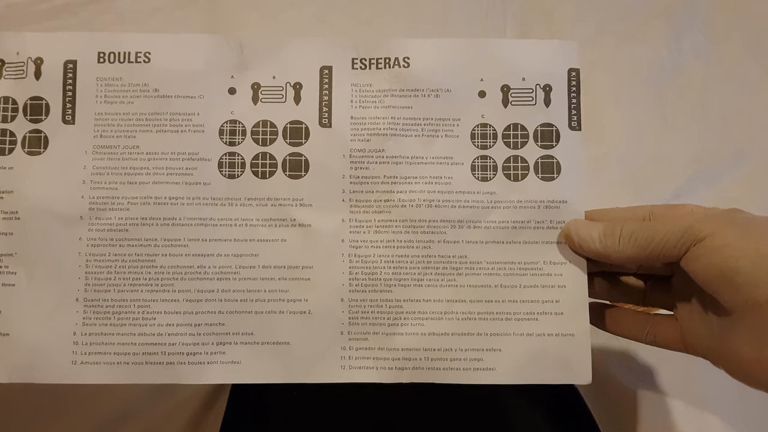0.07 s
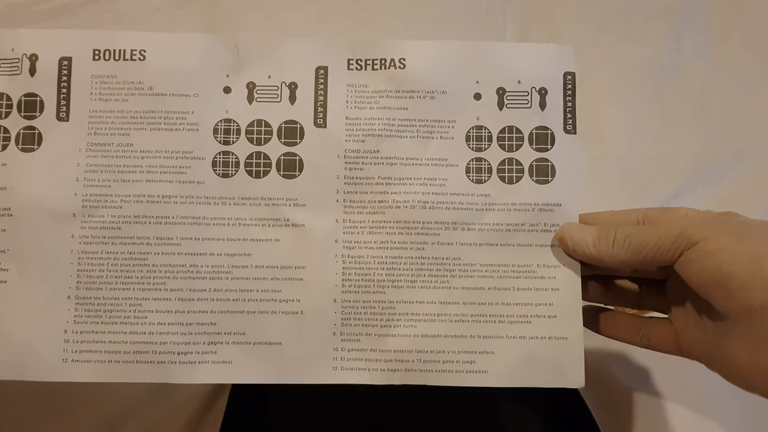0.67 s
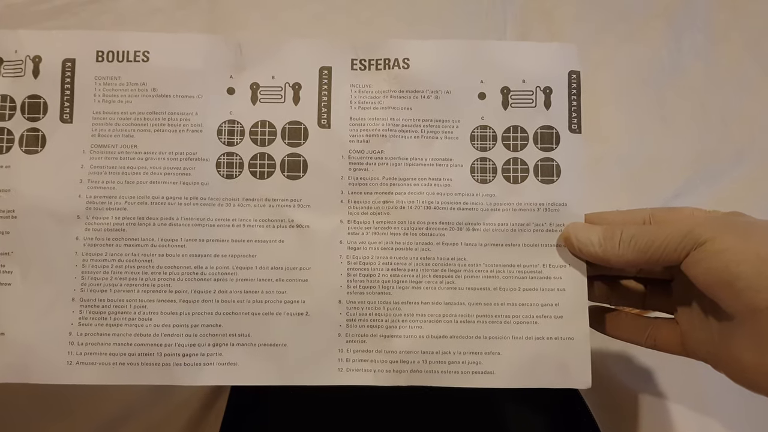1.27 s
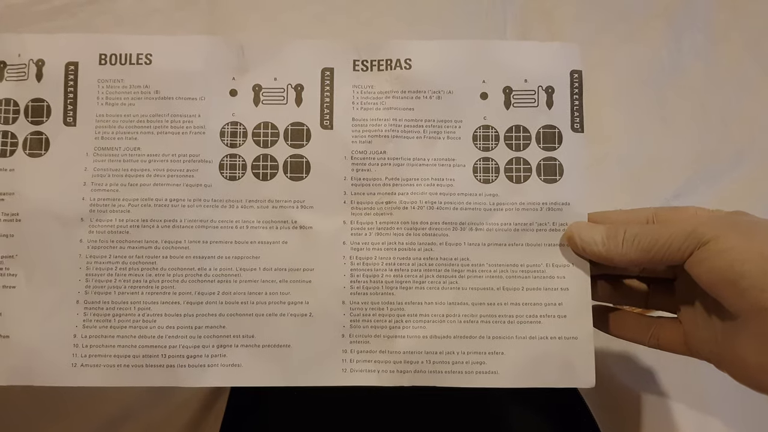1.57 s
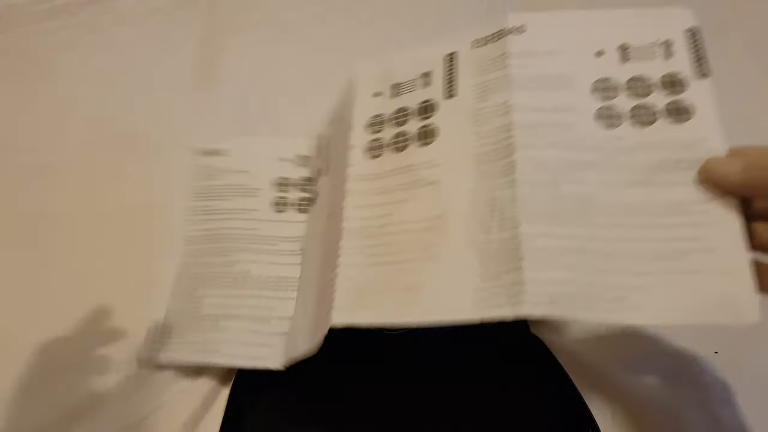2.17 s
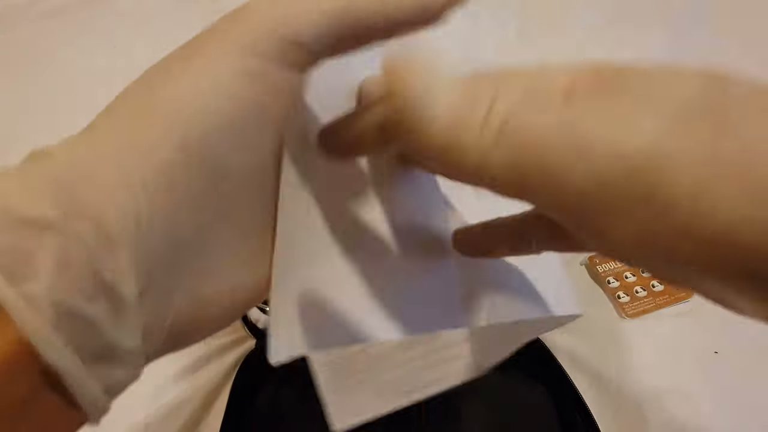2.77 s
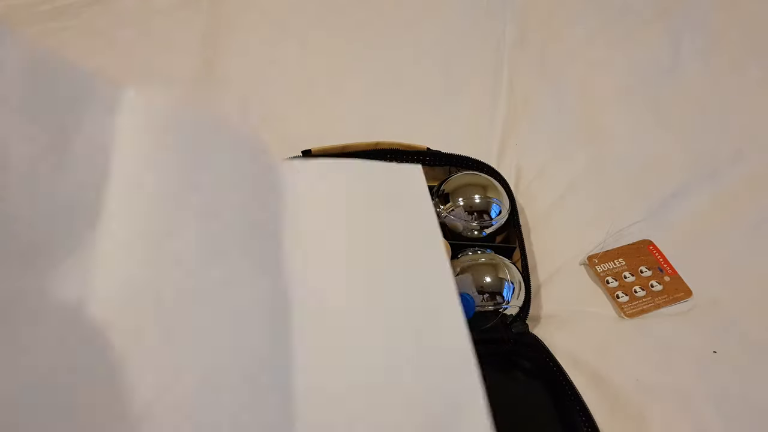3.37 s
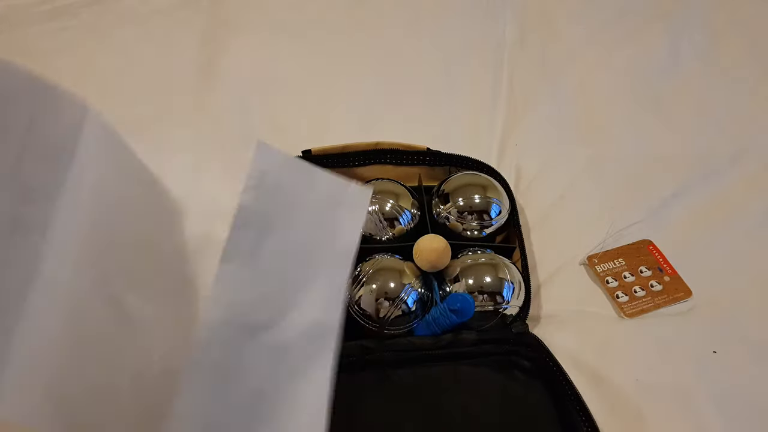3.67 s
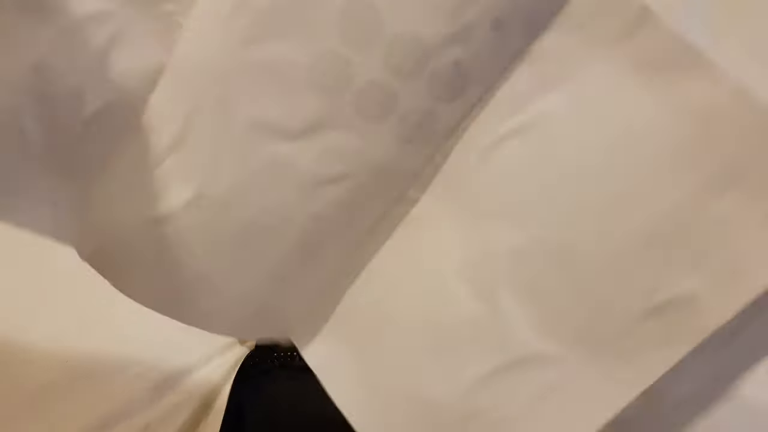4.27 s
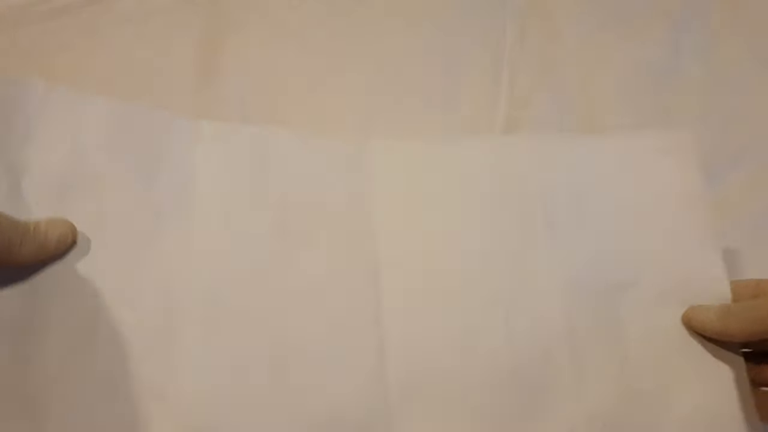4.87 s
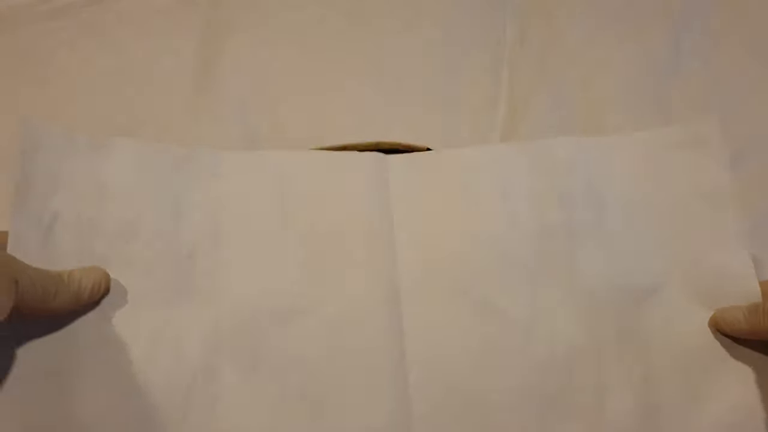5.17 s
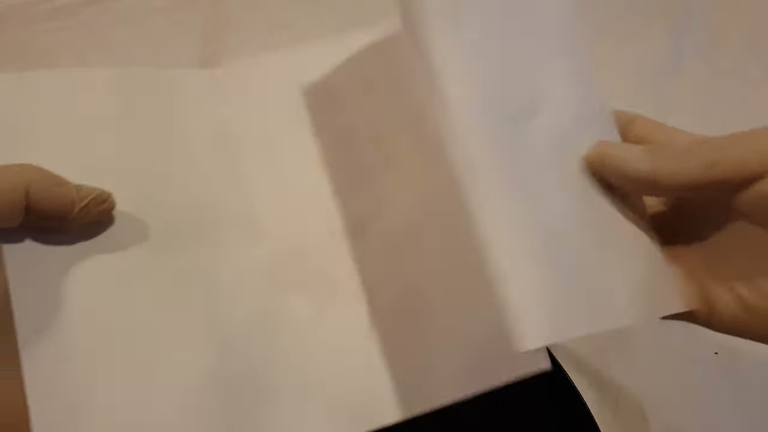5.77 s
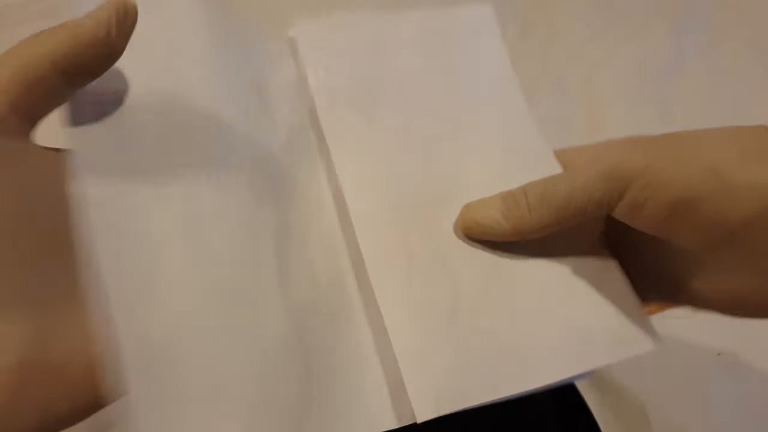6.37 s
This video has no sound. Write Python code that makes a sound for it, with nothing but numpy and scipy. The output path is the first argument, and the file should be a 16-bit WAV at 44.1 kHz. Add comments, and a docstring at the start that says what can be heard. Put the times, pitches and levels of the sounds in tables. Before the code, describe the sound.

Close to the microphone, a paper leaflet is first held almost silently, then turned in a busy run of crackles, hollow pops and soft flaps of air. The sheets brush together, a finger briefly drags across them, and the leaflet snaps open sharply. Lighter crinkling and separate snaps follow as it is folded again. The small room adds a short reverberation, with faint hiss and rumble underneath.

```python
"""In a small quiet room, a folded paper leaflet is held still, turned over, opened out and refolded.
Its panels buckle with sharp snaps and bend with hollow pops, while tiny creases yield in a fine crinkle.
Friction makes sheets swish on each other and hiss under a fingertip; the whole leaflet flaps the air.
The room reverberates after every sound of the paper; a low rumble and a faint hiss lie underneath."""
import sys
import numpy as np
from scipy import signal
from scipy.fft import rfft, irfft, next_fast_len
from scipy.io import wavfile
from scipy.ndimage import map_coordinates

SR = 44100
rng = np.random.default_rng(int(sys.argv[2]) if len(sys.argv) > 2 else 0)


def master_out(mix):
    """Clip the mix to full scale and print it as 16-bit PCM to the path in sys.argv[1]."""
    frames = np.transpose(np.atleast_2d(mix))
    ceiling = np.clip(frames, -1, 1)
    pcm = np.round(ceiling * 32767).astype(np.int16)
    wavfile.write(sys.argv[1], SR, pcm)


N = 282681

# likeness of the paper's sound on the two sides: (frequency [Hz], left-right correlation [-1..1])
PAPER_CORRELATION = [(200, 0.94), (500, 0.78), (1000, 0.28), (2000, -0.19), (10000, 0.096)]


def amp(db):
    return 10 ** (np.asarray(db) / 20)


def unit(x):
    return x / np.sqrt(np.mean(x ** 2) + 1e-20)


def along(points, hz):
    """Interpolate (frequency [Hz], value) points on a logarithmic axis."""
    f, v = np.transpose(points)
    return np.interp(np.log(hz + 1), np.log(f + 1), v)


def curve(rows):
    """Interpolate (time [s], value) points to one value per sample."""
    return np.interp(np.arange(N) / SR, *np.transpose(rows))


def wobble(rate):
    """Slow random modulation: a spline through `rate` knots a second."""
    return map_coordinates(rng.standard_normal(int(N * rate / SR) + 4), [np.arange(N) * rate / SR])


def filtered(x, response):
    """Linear filtering: the spectrum of x is multiplied by a frequency response."""
    n = x.shape[-1]
    m = next_fast_len(n + 4096)
    return irfft(rfft(x, m) * response(np.fft.rfftfreq(m, 1 / SR)), m)[..., :n]


def spread(pair, spectrum, correlation):
    """Mid-side mixing: two independent signals become a coloured, partly correlated pair of rms 1."""
    def gains(hz):
        angle = np.arccos(np.clip(along(correlation, hz), -1, 1)) / 2
        return amp(along(spectrum, hz)) * [np.cos(angle), np.sin(angle)]
    mid, side = filtered(pair, gains)
    return unit(np.array([mid + side, mid - side]))


def noise(spectrum, correlation=PAPER_CORRELATION, size=N):
    """Spectral shaping of white noise gives coloured stereo noise of rms 1."""
    return spread(rng.standard_normal((2, size)), spectrum, correlation)


def sheet_noise(share, size):
    """Partial coherence: a wide sheet radiates only a share of its power alike to both sides."""
    waves = rng.standard_normal((3, size))
    return np.sqrt(share) * waves[0] + np.sqrt(1 - share) * waves[1:]


def panned(pan_db):
    """Constant-power gains for a level difference, left minus right."""
    return unit(amp([[pan_db / 2], [-pan_db / 2]]))


def add(track, s, sound):
    """Superpose a stereo sound on the track at time s."""
    start = max(round(s * SR), 0)
    span = track[:, start:start + sound.shape[1]]
    span += sound[:, :span.shape[1]]


def background(level_db=-61.0, waver_db=1, rumble_hz=200):
    """Noise floor: a low rumble, slowly modulated in amplitude, under the microphones' steady hiss."""
    spectrum = [(12, -51), (20, -30), (38, -12.5), (63, -4.5), (107, -10.5), (168, -23.5), (293, -31),
                (410, -36.5), (472, -37), (718, -40), (1570, -39.5), (3160, -42.5), (9950, -48),
                (14700, -38), (16000, -43.5)]  # noise floor: (frequency [Hz], spectral level [dB])
    correlation = [(60, 0.99), (200, 0.74), (600, 0.18), (2000, 0.069), (12000, .05)]  # its likeness: (frequency [Hz], left-right correlation [-1..1])
    swell = [(0, 0.5), (1, -1), (1.6, 2), (2.2, 3.5), (4.5, -2.5), (6.41, 1.5)]  # drift of the rumble: (time [s], gain [dB])
    steady = noise(spectrum, correlation)
    rumble = filtered(steady, lambda hz: 1 / (1 + (hz / rumble_hz) ** 4))
    hiss = steady - rumble
    return amp(level_db) * (hiss + rumble * amp(curve(swell) + waver_db * wobble(4)))


def tick(at_s=.6955, level_db=-36, t60=0.0035):
    """Stress release: one crease lets go under the thumb in a thin, exponentially decaying burst."""
    spectrum = [(4500, -43), (6200, -6), (9000, -36), (11800, 8), (15000, -7)]  # the crease's colour: (frequency [Hz], spectral level [dB])
    out, t = np.zeros((2, N)), np.arange(SR // 20) / SR
    add(out, at_s, amp(level_db - 60 * t / t60) * noise(spectrum, size=len(t)))
    return out


def room_tail(gap_s=0.003, build_s=0.0054):
    """Diffuse impulse response: reflections build after a gap, and each frequency dies at its own rate."""
    decay = [(150, 0.28), (600, 0.15), (2000, 0.21), (5000, 0.32), (9000, 0.28), (14000, 0.28)]  # reverberation time: (frequency [Hz], t60 [s])
    modes = [(765, 87, 1.5), (1866, 52, 7)]  # room resonances: (frequency [Hz], width [Hz], gain [dB])
    colour = [(100, 3), (200, 0), (400, 3), (700, 4.5), (1300, 0), (2000, 1.5), (3500, 0.8), (5500, -1.5),
              (9000, -0.06), (12500, 1), (16000, 3)]  # colour of the reflections: (frequency [Hz], gain [dB])
    hz, t, bins = signal.stft(rng.standard_normal((2, SR // 2)), SR, nperseg=256)
    tail = signal.istft(bins * amp(-60 * t / along(decay, hz)[:, None]), SR, nperseg=256)[1]
    tail = filtered(tail, lambda f: amp(sum(db / (1 + (2 * (f - c) / w) ** 2) for c, w, db in modes)))
    tail = spread(tail, colour, PAPER_CORRELATION)
    tail *= np.clip((np.arange(tail.shape[1]) / SR - gap_s) / build_s, 0, 1)
    return tail / np.linalg.norm(tail[0])


def room(x, wet_db=-4.5):
    """Reverberation by convolution, with a new response every quarter second as the leaflet moves."""
    out, step = np.zeros((2, N)), SR // 4
    for start in range(0, N, step):
        add(out, start / SR, signal.fftconvolve(x[:, start:start + step], room_tail(), axes=1))
    return amp(wet_db) * out


def flexes(push_t60=0.032, rise_s=.0015, damping=0.49, upper_ratio=1.675, upper_db=-12, share=0.87):
    """Damped resonance: a bending panel excites a low mode and a weaker upper one in a hollow pop."""
    bends = [(.888, -74, 480), (.985, -72.5, 1110), (1.933, -57, 814), (2.014, -57.5, 664),
             (2.076, -43, 766), (2.226, -47.5, 930), (2.391, -36.5, 970), (2.772, -37.5, 350),
             (2.776, -37.5, 1300), (2.787, -45.5, 670), (2.944, -42, 335), (3.255, -39, 357),
             (3.304, -42.5, 610), (3.392, -42.5, 260), (3.405, -41, 754), (3.833, -43, 850),
             (3.954, -50, 800), (4.151, -50, 587), (4.71, -34, 670), (4.781, -41, 1020), (4.838, -38, 885),
             (4.855, -33, 810), (5.007, -48.5, 760), (5.14, -61, 750), (5.204, -52, 820), (5.25, -44, 780),
             (5.432, -41, 694), (5.569, -36, 670), (5.716, -46.5, 547), (5.799, -45.5, 1530),
             (5.843, -46.5, 2070), (6.172, -51, 260), (6.246, -37, 340), (6.399, -37, 620)]  # wide panels bending over: (time [s], level [dB], pitch [Hz])
    out, t = np.zeros((2, N)), np.arange(SR // 8) / SR
    onset = SR // 80  # levels refer to the first 12.5 ms

    def mode(hz, centre_hz):
        loss = 2j * damping * hz * centre_hz
        return (loss / (centre_hz ** 2 - hz ** 2 + loss)) ** 3
    for s, db, pitch_hz in bends + nods():
        push = sheet_noise(share, len(t)) * amp(-60 * t / push_t60) * (1 - np.exp(-t / rise_s))
        upper_hz = pitch_hz * upper_ratio
        pop = filtered(push, lambda hz: mode(hz, pitch_hz) + amp(upper_db) * mode(hz, upper_hz))
        add(out, s, amp(db) * pop / pop[:, :onset].std())
    return out


def swishes(catch_db=2, pan_db=-4):
    """Sliding friction: sheet rubs on sheet in strokes that swell and fade, the fibres catching."""
    strokes = [(1.843, 0.046, -74), (2.051, 0.027, -58.5), (2.181, 0.015, -50.5), (2.76, 0.032, -48.5),
               (2.9, 0.034, -45.5), (3.18, 0.063, -61), (3.295, 0.02, -42.5), (3.35, 0.039, -36),
               (3.458, 0.04, -47.5), (3.714, 0.022, -40), (3.848, 0.024, -39.5), (4.35, 0.32, -68),
               (5.81, 0.31, -64.5)]  # Gaussian sweeps: (centre time [s], standard deviation [s], level [dB])
    spectrum = [(400, -32), (1300, -22), (3000, -6.5), (4500, 2.5), (6500, 1.5), (8500, -3.5), (12500, 3.5),
                (14500, -2), (16000, -14)]  # paper on paper: (frequency [Hz], spectral level [dB])
    t = np.arange(0, N / SR, .002)
    speed = sum(amp(db) * np.exp(-.5 * ((t - s) / width) ** 2) for s, width, db in strokes)
    catching = amp(catch_db * wobble(300))
    return curve(np.c_[t, speed]) * unit(catching * noise(spectrum)) * panned(pan_db)


def snaps(usual_db=-36.5, usual_t60=0.035, rise_s=0.000067, flutter_db=-20, flutter_t60=0.042):
    """Snap-through buckling: a burst of bending waves dies fastest in the treble; a weak flutter stays."""
    # buckling panels: (time [s], body level [dB], crack [dB re body], sizzle [dB re body])
    buckles = [(2.066, -40.5, -1, -7.5), (2.1, -46.5, -4, -18), (2.173, -38, -11, -11.5),
               (2.221, -41, -23, -23), (2.3439, -35.5, -5.5, -23), (2.3801, -29, -11, -21),
               (2.391, -41, 7.5, -7), (2.4599, -45, 5.5, -11), (2.571, -35, -3.5, -20),
               (2.591, -29.5, 6, 1.5), (2.695, -36, 0, -13), (2.729, -38, -9, -25), (2.74, -34.5, -13, -31),
               (2.752, -34, -19, -25), (2.841, -36.5, -18, -25), (2.88, -29.5, -7.5, -34),
               (2.904, -33, -5, -23), (2.925, -38, -14, -23), (2.959, -30.5, -5, -30),
               (3.2035, -39, 3, -7.5), (3.255, -35.5, -4, -29), (3.304, -28.5, 2, -8), (3.3932, -39, 1, -4),
               (3.405, -35.5, 1, -9), (3.6082, -37.5, 3.5, -3.5), (3.665, -40, -4, -16),
               (3.687, -30.5, -1.5, -23), (3.764, -41, -12, -19), (3.963, -49, -8, -24),
               (4.0104, -45.5, -8.5, -26), (4.033, -46, -19, -21), (4.496, -45, -13.5, -22),
               (4.546, -49.5, -21, -29), (4.6877, -37, -3, -16), (4.71, -36.5, -6, -18),
               (4.729, -24.5, 0, -7.5), (4.817, -36.5, -4, -24), (4.836, -37.5, 1, -14.5),
               (4.861, -32, 0.5, -4), (4.8779, -21.5, -5.5, -2), (4.892, -39, 1, 9.5),
               (4.907, -37.5, 7.5, 1), (5.217, -40, -3.5, -19), (5.247, -38.5, 3, -13), (5.31, -37, 7, 0.5),
               (5.32, -41, -6, -13), (5.374, -42.5, 4, -22), (5.4255, -36, 2.5, -23), (5.55, -46, 6, -20),
               (5.5653, -26, -2.5, -8.5), (5.658, -40, 0, -21), (5.736, -46, -11, -9.5),
               (5.831, -39, -16, -42), (5.935, -38, 0, -16), (6.009, -41.5, 4, -16),
               (6.096, -42.5, -5, -14), (6.224, -33, 5, -12), (6.2835, -33, 3.5, 0), (6.376, -43, -6, -14),
               (6.398, -38, 2, -15)]
    # thump, body, crack and sizzle: (low edge [Hz], high edge [Hz], ring time [x t60], coherence [0..1])
    bands = [(139, 1110, 1.62, 0.85), (932, 2755, 1.32, 0.45), (2870, 6030, 0.56, 0.13),
             (6400, 13300, 0.4, 0.12)]
    out, t = np.zeros((2, N)), np.arange(SR // 12) / SR
    onset = SR // 125  # levels refer to the first 8 ms
    attack = 1 - np.exp(-t / rise_s)
    filters = [signal.butter(3, [lo, hi], "band", fs=SR, output="sos") for lo, hi, *_ in bands]
    for s, db, crack_db, sizzle_db in buckles:
        # the harder a panel snaps, the less of it is thump and the sooner it is over
        force_db = db - usual_db
        thump_db = -6.5 - 0.35 * force_db
        t60 = usual_t60 * 2 ** (0.57 * rng.standard_normal() - force_db / 62)
        snap = np.zeros((2, len(t)))
        for sos, (_, _, ring, share), band_db in zip(filters, bands, (thump_db, 0, crack_db, sizzle_db)):
            fade = amp(-60 * t / (t60 * ring)) + amp(flutter_db - 60 * t / (flutter_t60 * ring))
            burst = signal.sosfilt(sos, sheet_noise(share, len(t)) * fade * attack)
            snap += amp(band_db) * burst / burst[:, :onset].std(axis=1, keepdims=True)
        add(out, s, amp(db) * placed(snap, s))
    return out


def placed(sound, s, ahead_db=-2.5, aside_db=4, max_lag_s=.0003, shade_hz=2530):
    """Path difference and shadowing: the far side hears a fold later and weaker, most so in the treble."""
    position = [(2.4, 1.5), (2.7, -1.5), (3.2, -2), (3.26, 1.5), (3.7, 0), (4.03, 6.5), (4.5, 0.5),
                (4.69, -5), (5.42, -2.5), (5.6, -2), (6.41, -1.5)]  # where the working fold lies: (time [s], left minus right at shade_hz [dB])
    pan_db = np.interp(s, *np.transpose(position))
    lag = max_lag_s * np.clip((pan_db - ahead_db) / aside_db, -1, 1)
    delays = np.maximum([[-lag], [lag]], 0)

    def paths(hz):
        shade = amp(np.array([[.5], [-.5]]) * pan_db * np.cbrt(hz / shade_hz))
        return shade / np.sqrt(np.mean(shade ** 2, axis=0)) * np.exp(-2j * np.pi * hz * delays)
    return filtered(sound, paths)


def effort(t, swell_db_per_s=325.5, settle_db_per_s=176.5):
    """Exponential envelopes of flapping and crinkling [dB]: each move swells, holds and settles."""
    moves = [(2.08, 0.011, -60, -54), (2.21, 0.013, -59.5, -46.5), (2.4, 0.027, -64, -43),
             (2.6, 0.077, -52, -38), (2.678, 0.058, -48, -35.5), (2.89, 0.071, -47.5, -41.5),
             (3.258, 0.13, -50, -40.5), (3.5, 0.14, -54.5, -54), (3.662, 0.068, -48, -38),
             (3.858, 0.01, -50.5, -41.5), (3.99, 0.096, -61, -58.5), (4.22, 0.092, -54.5, -70.5),
             (4.5, 0.012, -55, -64), (4.72, 0.021, -42.5, -47.5), (4.868, 0.011, -43, -37),
             (5.26, 0.0072, -48, -49), (5.43, 0.011, -51, -77), (5.58, 0.019, -48, -47.5),
             (5.68, 0.09, -51, -53.5), (5.86, 0.69, -61.5, -60.5), (6.25, 0.0067, -40.5, -39),
             (6.4, 0.011, -46, -40.5)]  # moves of the hands: (time [s], hold [s], flapping [dB], crinkling [dB])
    s, hold, flap_db, crinkle_db = np.transpose(moves)[..., None]
    shape_db = -swell_db_per_s * np.maximum(s - t, 0) - settle_db_per_s * np.maximum(t - s - hold, 0)
    return np.max(flap_db + shape_db, axis=0), np.max(crinkle_db + shape_db, axis=0)


def crinkle(pops_per_s=170, t60=0.023, rustle=0.4):
    """Shot noise: tiny creases yield at random, their bursts adding in power over a fine rustle."""
    spectrum = [(150, -31.5), (350, -11), (800, -5), (1300, -3), (2400, 0.5), (4000, 1), (5500, -9),
                (7500, -11), (15000, -24.5)]  # yielding creases: (frequency [Hz], spectral level [dB])
    yielding = rng.random(N) < pops_per_s / SR
    pops = yielding * amp(6 * np.minimum(rng.exponential(size=N), 2.5))
    t = np.arange(SR // 20) / SR
    power = np.abs(signal.fftconvolve(pops ** 2, amp(-60 * t / t60) ** 2)[:N])
    envelope = unit(np.sqrt(power)) + rustle
    return spread(envelope * rng.standard_normal((2, N)), spectrum, PAPER_CORRELATION)


def handling(flap_db=-2, crinkle_db=0.5, pan_db=-1, brisk_db=-52, dull_hz=1900):
    """Displacement and strain: the leaflet pushes air and works its creases, brighter when brisk."""
    spectrum = [(25, -20), (70, -0.5), (130, 1.5), (190, 2), (280, -3), (450, -14), (700, -11.5),
                (1500, -44.5)]  # displaced air: (frequency [Hz], spectral level [dB])
    t = np.arange(0, N / SR, .002)
    flapping, crinkling = (amp(curve(np.c_[t, db])) for db in effort(t))
    flap = amp(flap_db) * flapping * noise(spectrum)
    bright = crinkle()
    dull = filtered(bright, lambda hz: 1 / (1 + (hz / dull_hz) ** 4))
    briskness = crinkling / (crinkling + amp(brisk_db))
    creases = briskness * bright + (1 - briskness) * unit(dull)
    return flap + amp(crinkle_db) * crinkling * creases * panned(pan_db)


def nods(from_s=3.47, to_s=4.3, count=9, over_flap_db=4.5, scatter_db=2, usual_hz=595):
    """Forced motion: flapping bends the dangling panels, as rows of (time [s], level [dB], pitch [Hz])."""
    times = from_s + (to_s - from_s) * (np.arange(count) + rng.random(count)) / count
    size, pitch = rng.standard_normal((count, 2)).T
    flap_db, _ = effort(times)
    return list(zip(times, flap_db + over_flap_db + scatter_db * size, usual_hz * 2 ** (.5 * pitch)))


def fingertip(grip_db=3, pan_db=-8, catch_t60=0.0072):
    """Stick-slip friction: skin drags over paper on the right with an uneven hiss and catches in ticks."""
    drag = [(4.12, -76), (4.22, -75), (4.33, -76), (4.37, -73), (4.44, -59), (4.50, -70), (4.56, -88)]  # the fingertip's stroke: (time [s], level [dB])
    catches = [(4.363, -38), (4.396, -33.5)]  # the skin catching: (time [s], level [dB])
    spectrum = [(1500, -47), (2800, -27), (3600, -2.5), (5500, 2), (8000, -17.5), (12000, -17),
                (16000, -17)]  # skin on paper: (frequency [Hz], spectral level [dB])
    t = np.arange(N) / SR
    pressure = amp(np.interp(t, *np.transpose(drag), left=-120, right=-120))
    grip = unit(amp(grip_db * wobble(120)))
    catching = sum((t >= s) * amp(db - 60 * np.abs(t - s) / catch_t60) for s, db in catches)
    return (pressure * grip + catching) * panned(pan_db) * noise(spectrum)


def scene():
    """Superposition of the paper's direct sound, its reverberation and the noise floor."""
    paper = snaps() + flexes() + handling() + swishes() + fingertip() + tick()
    return paper + room(paper) + background()


def record(dry):
    """Band limiting: a steep low-pass removes the treble above 15950 Hz."""
    return filtered(dry, lambda hz: 1 / (1 + (hz / 15950) ** 120))


dry = scene()
out = record(dry)
master_out(out)
```